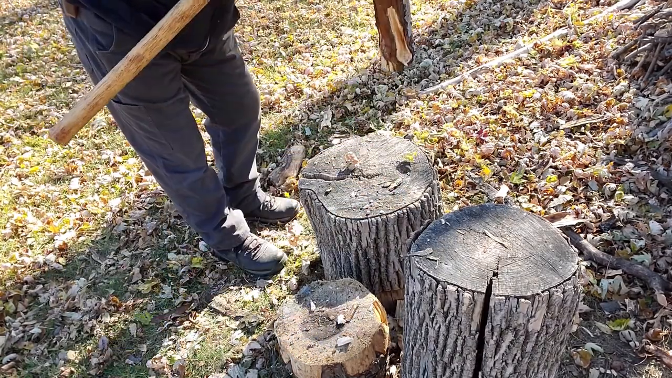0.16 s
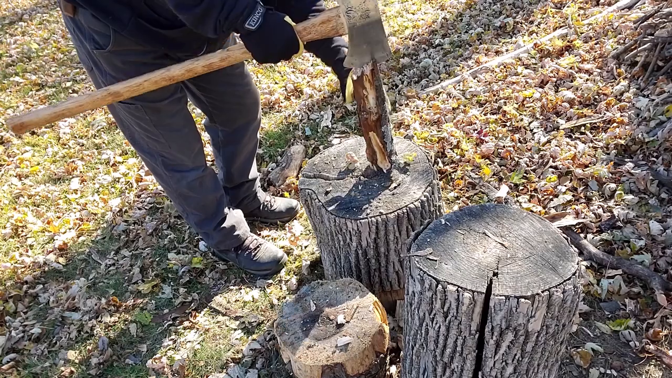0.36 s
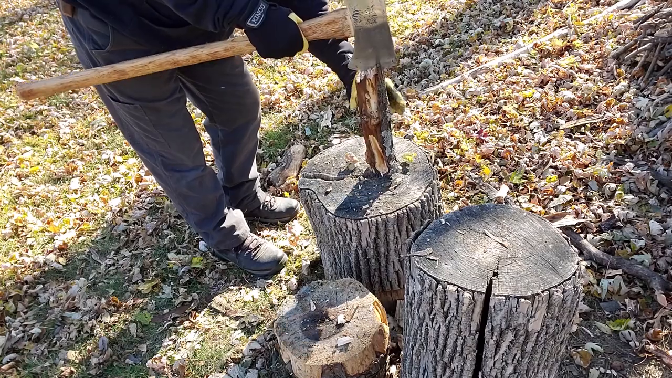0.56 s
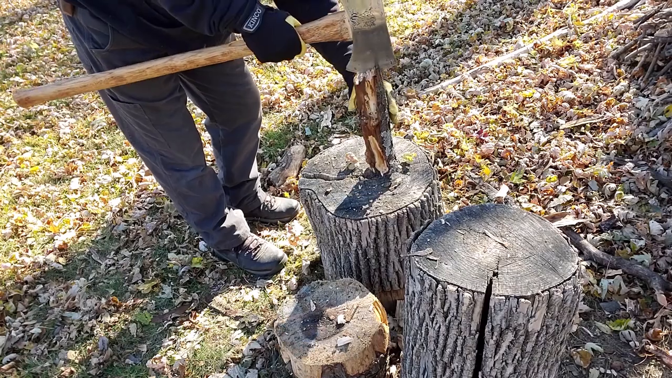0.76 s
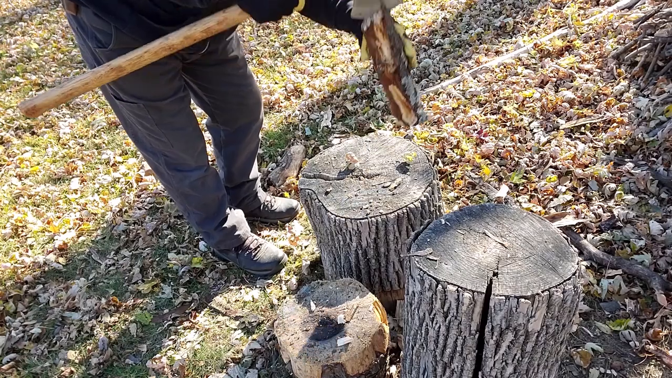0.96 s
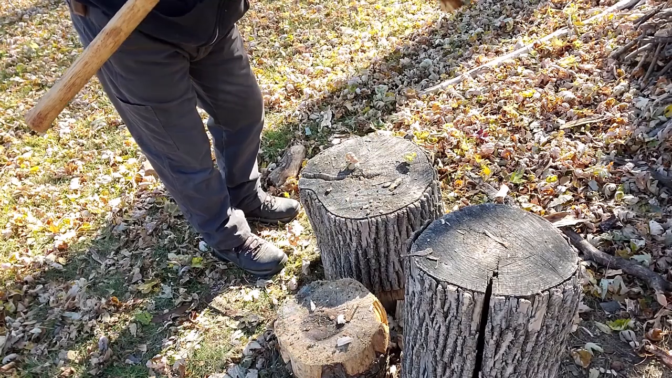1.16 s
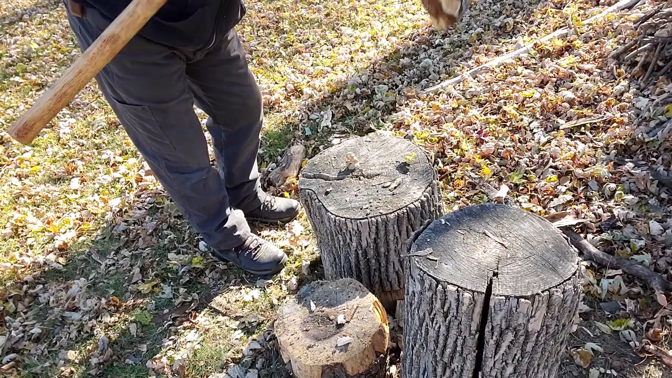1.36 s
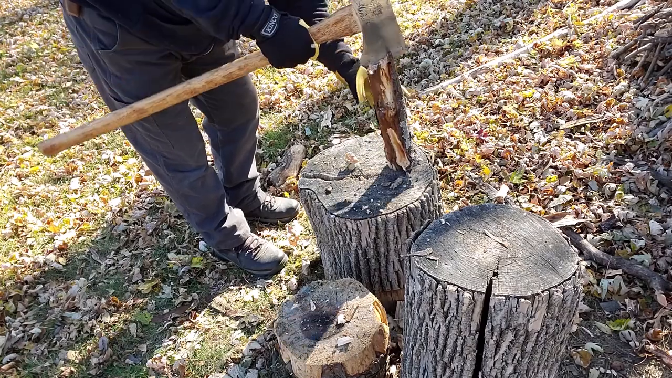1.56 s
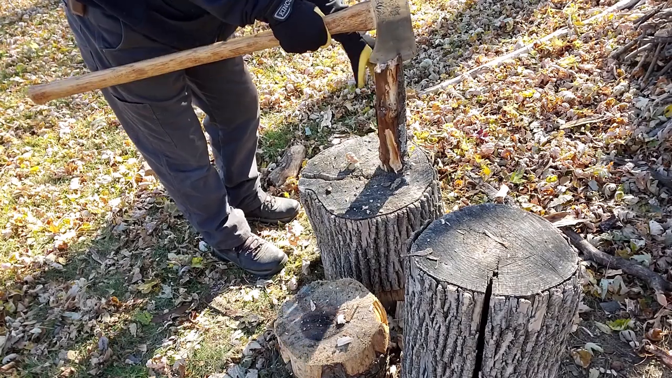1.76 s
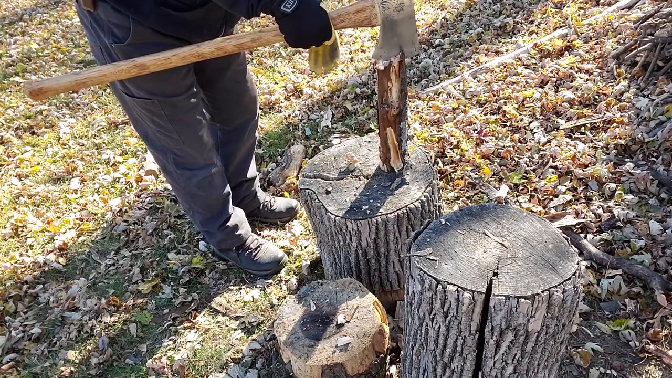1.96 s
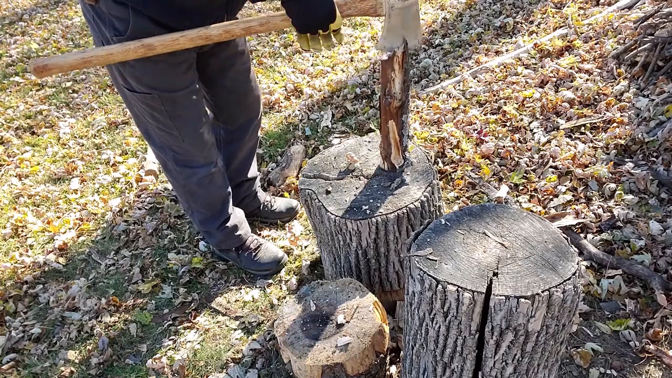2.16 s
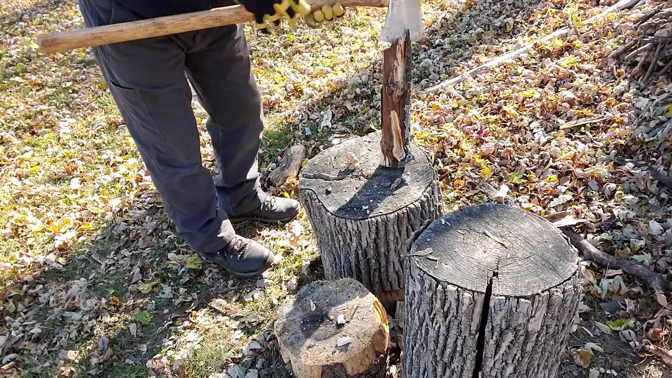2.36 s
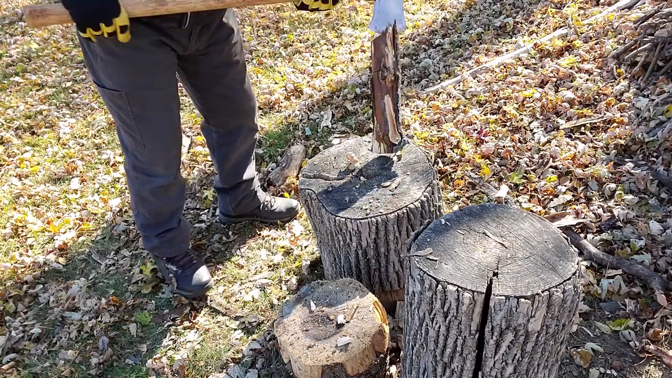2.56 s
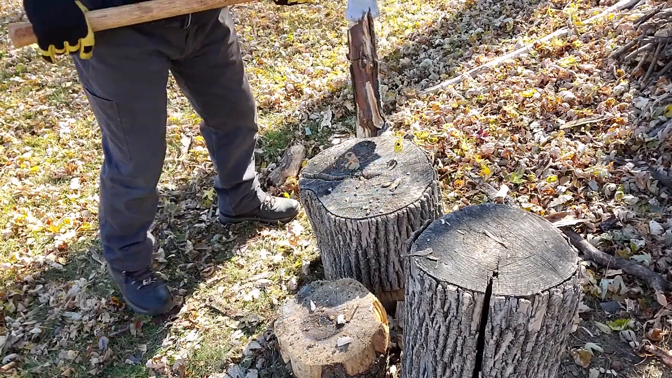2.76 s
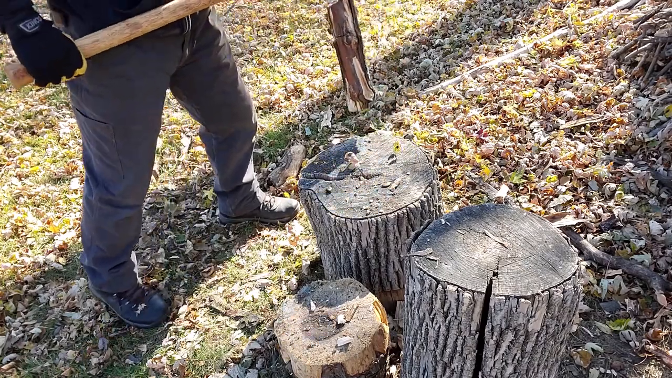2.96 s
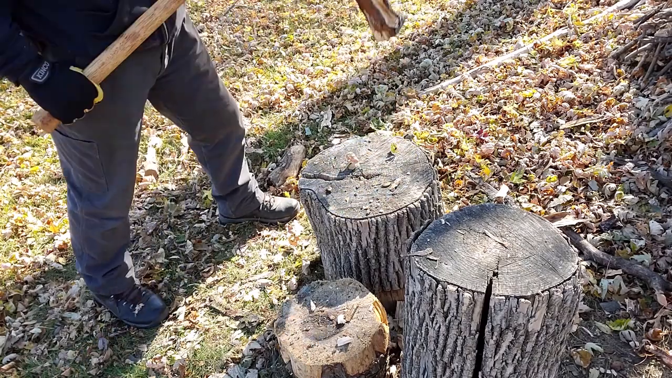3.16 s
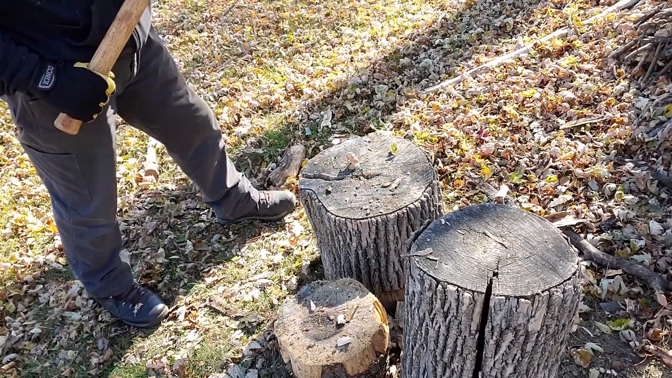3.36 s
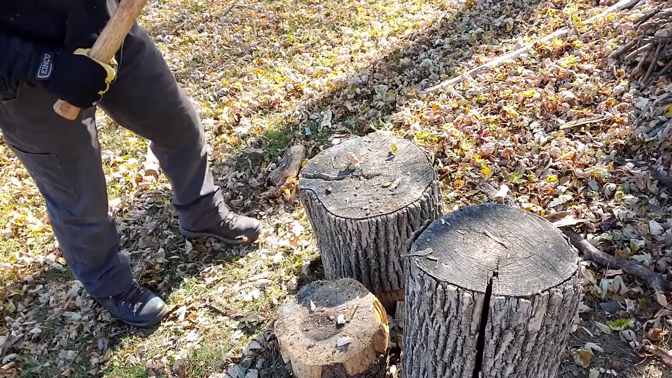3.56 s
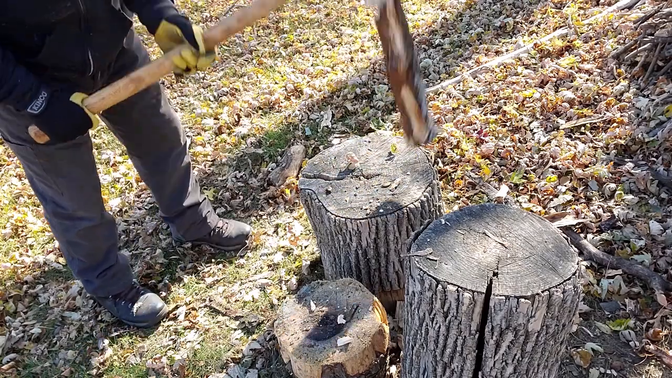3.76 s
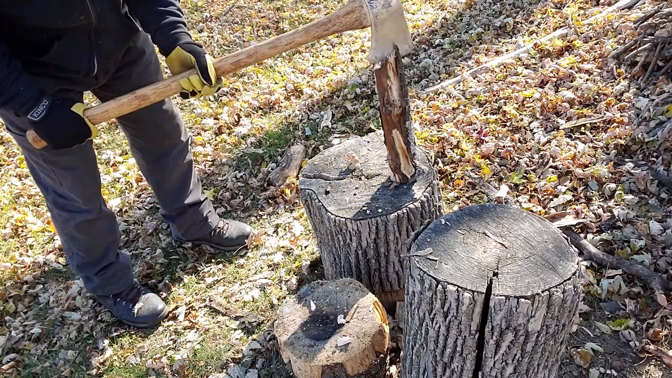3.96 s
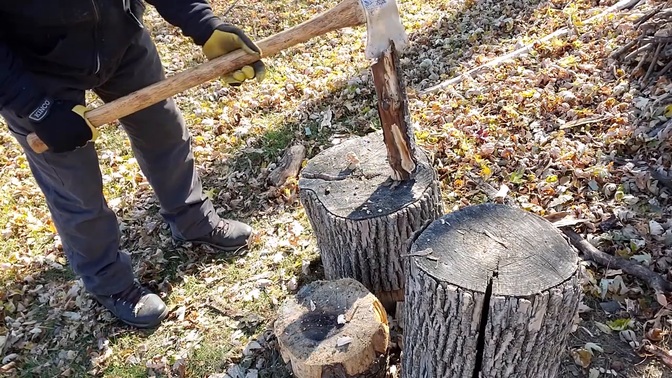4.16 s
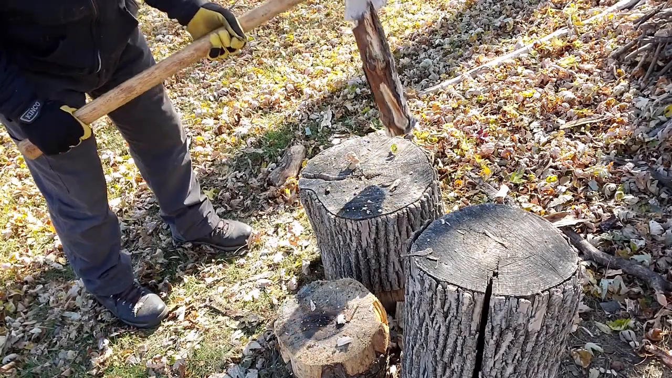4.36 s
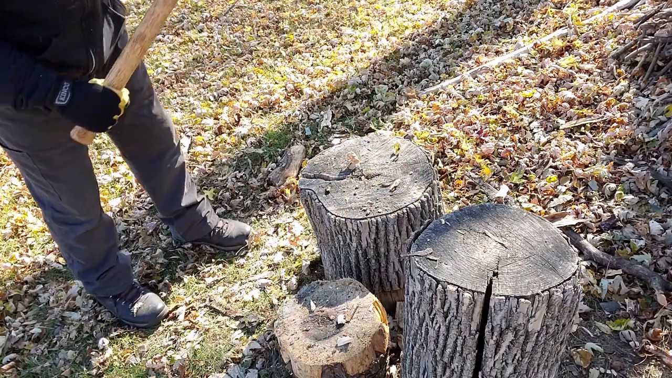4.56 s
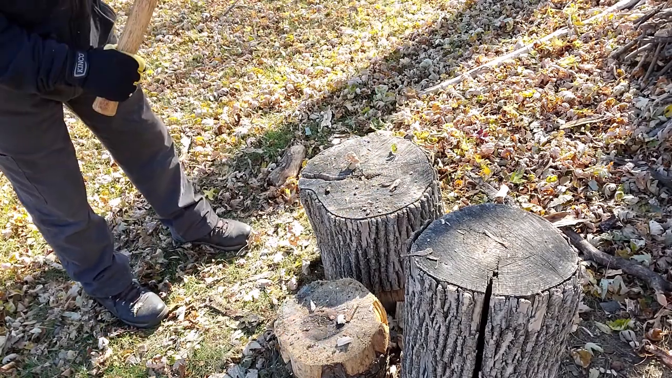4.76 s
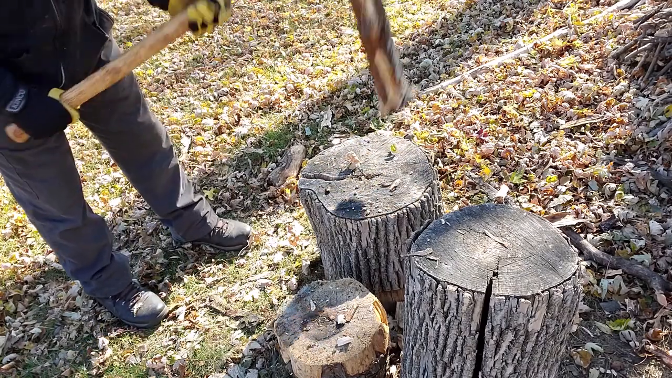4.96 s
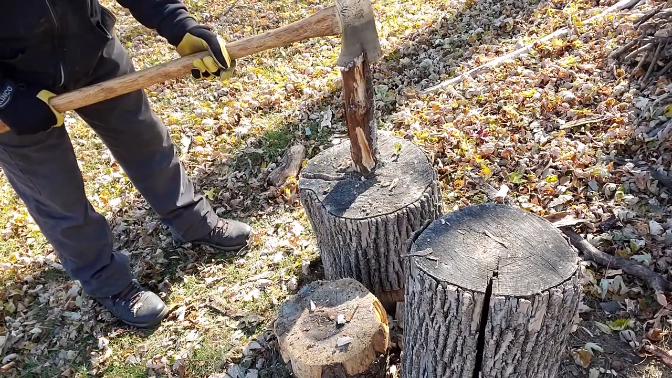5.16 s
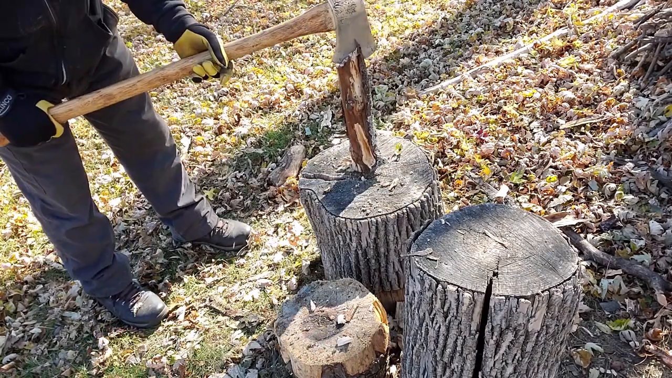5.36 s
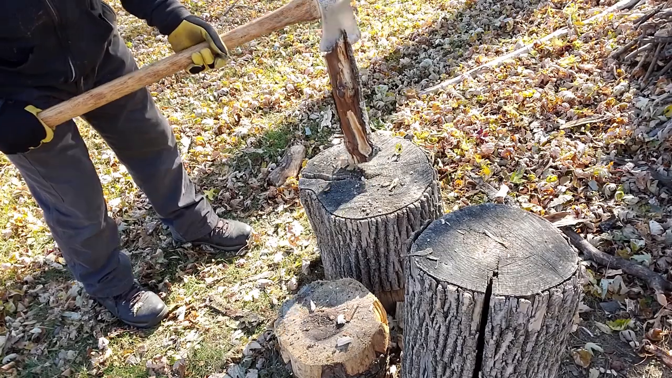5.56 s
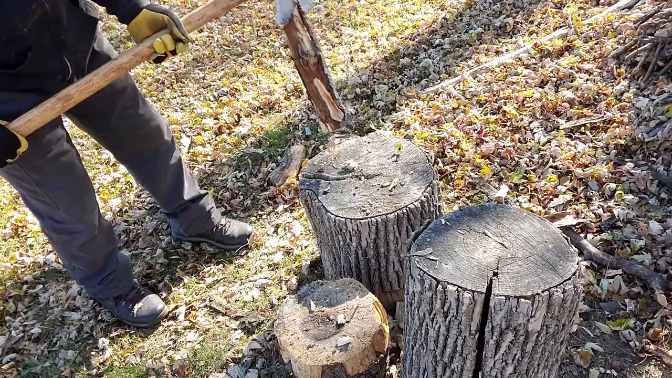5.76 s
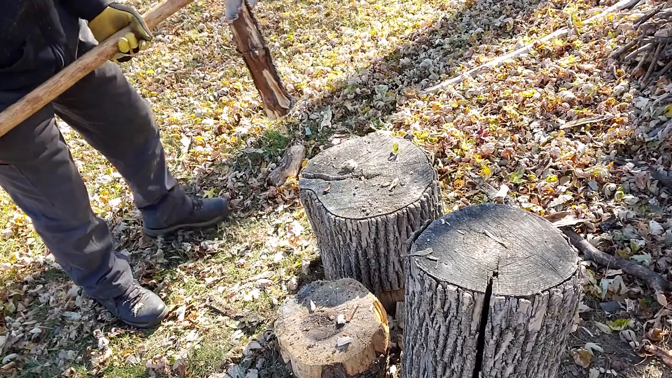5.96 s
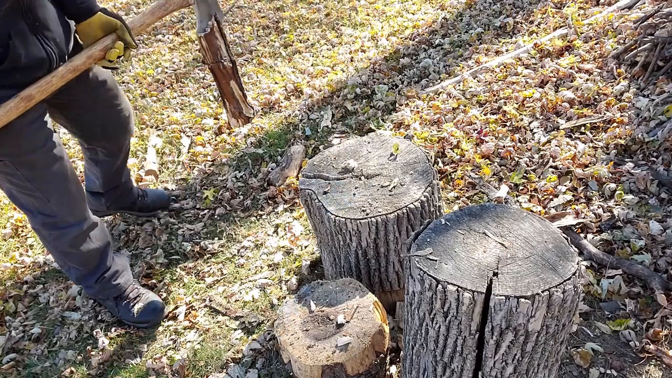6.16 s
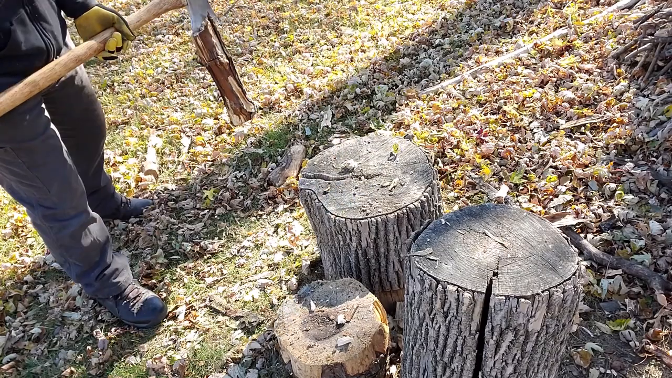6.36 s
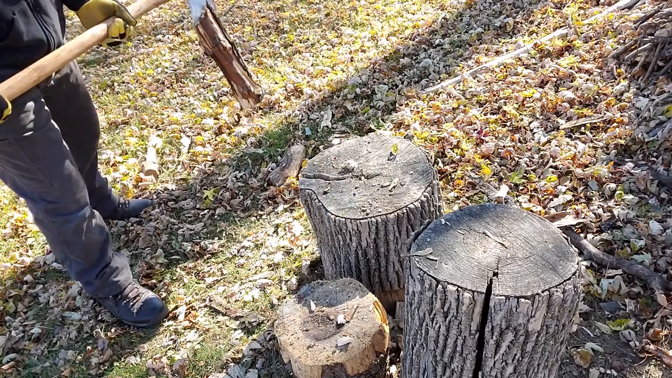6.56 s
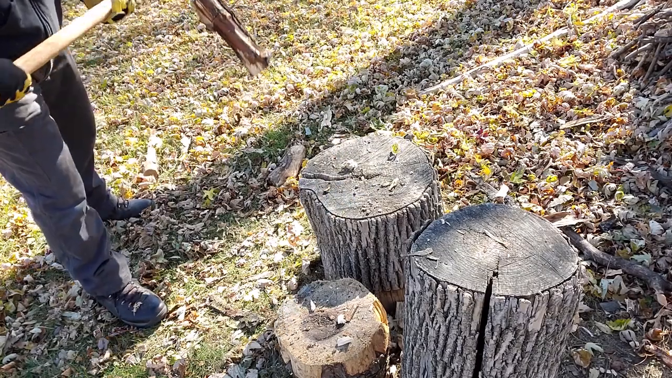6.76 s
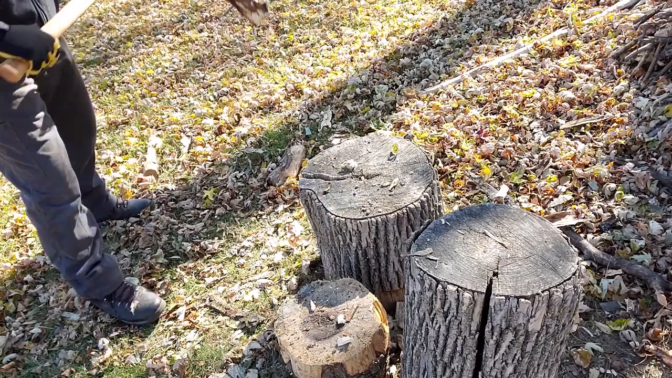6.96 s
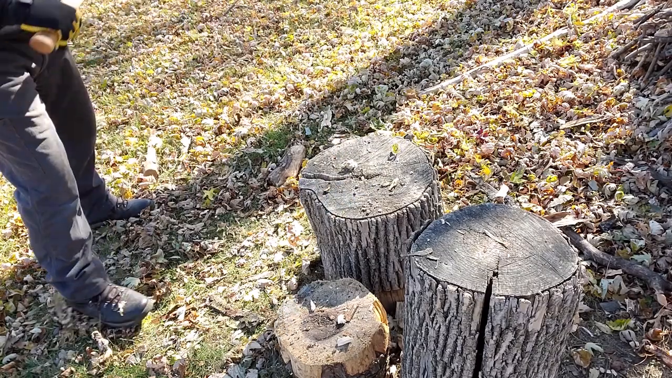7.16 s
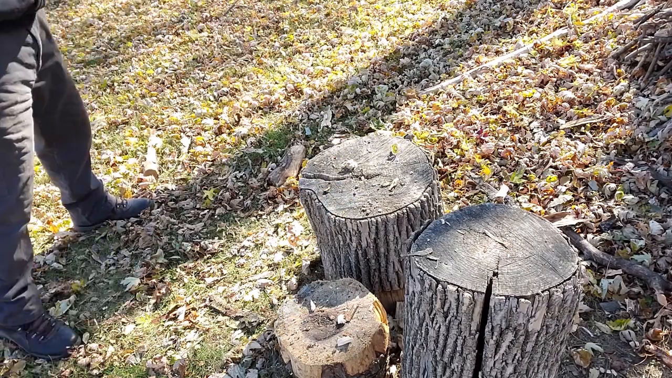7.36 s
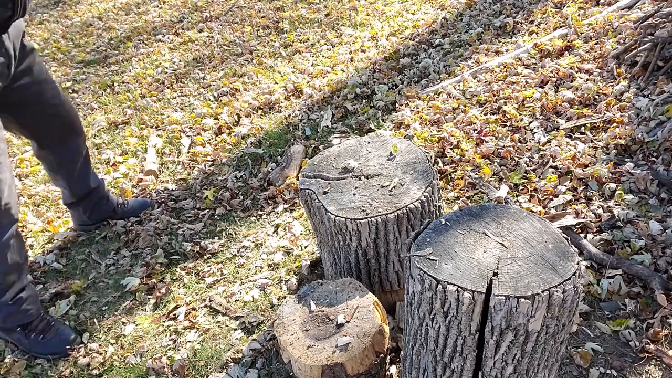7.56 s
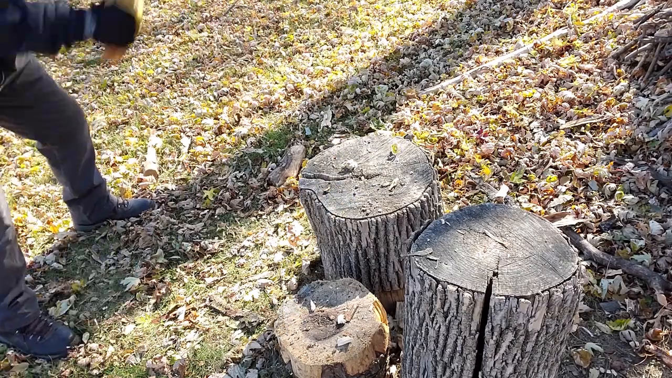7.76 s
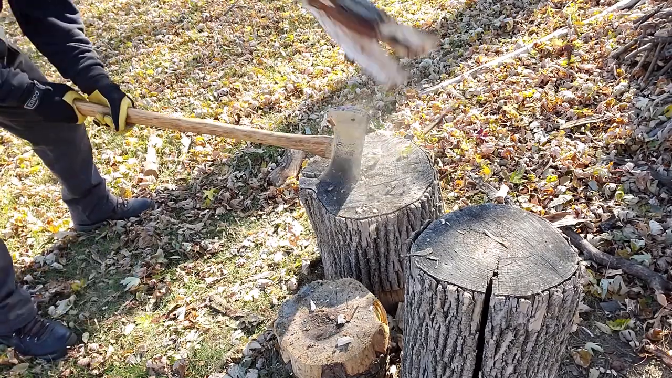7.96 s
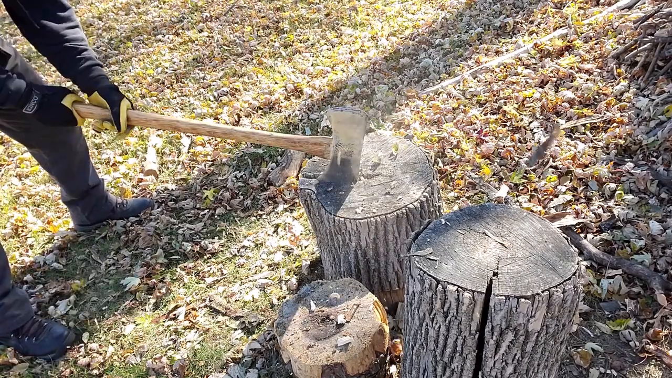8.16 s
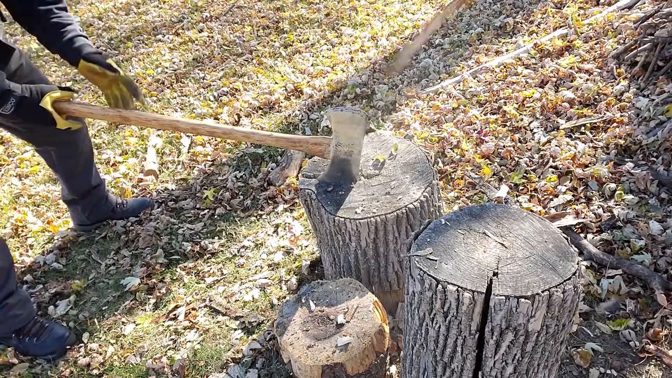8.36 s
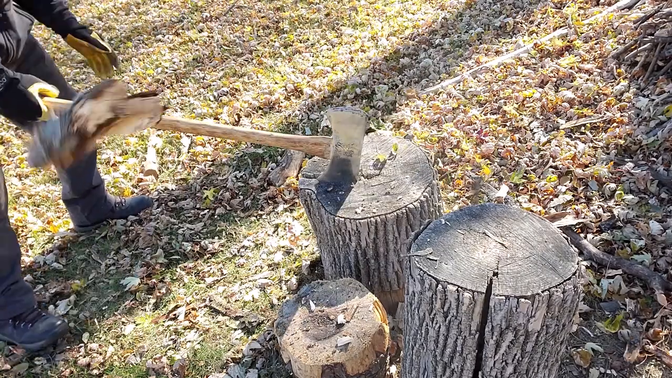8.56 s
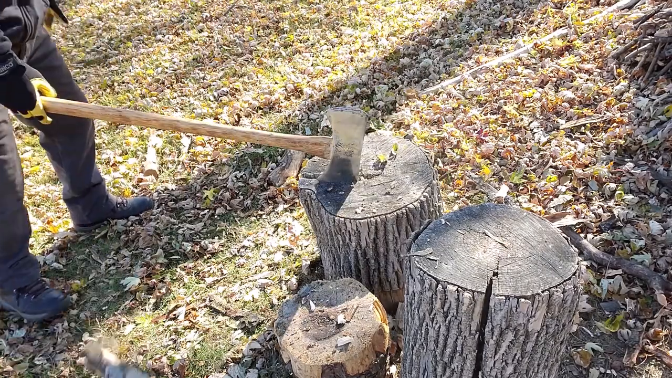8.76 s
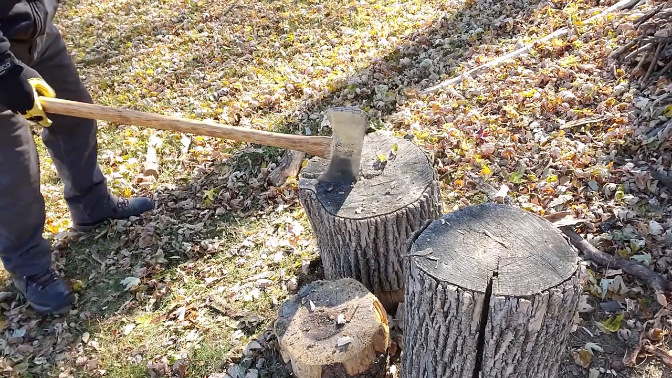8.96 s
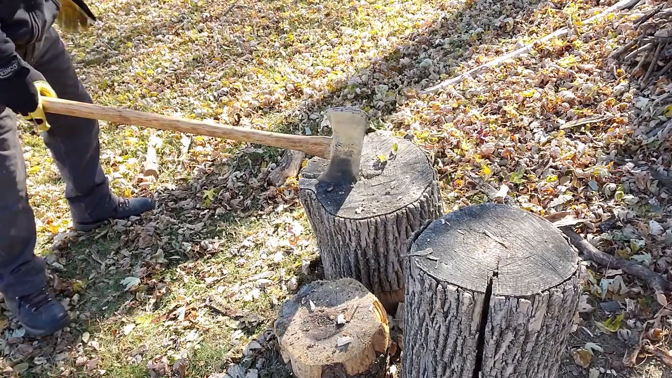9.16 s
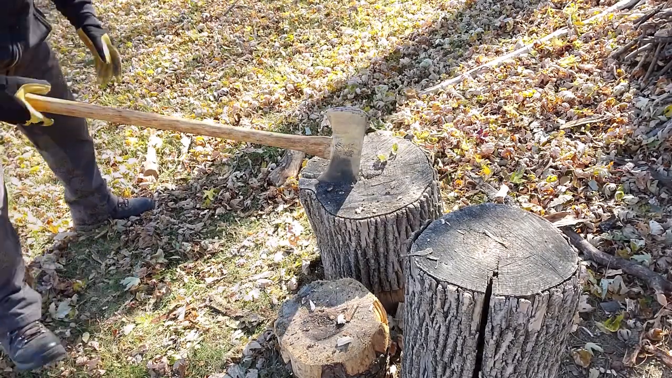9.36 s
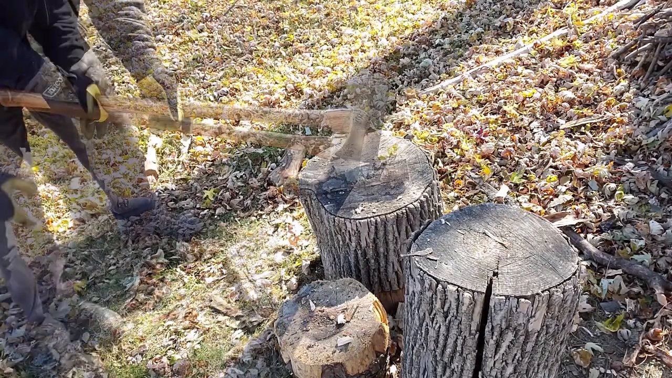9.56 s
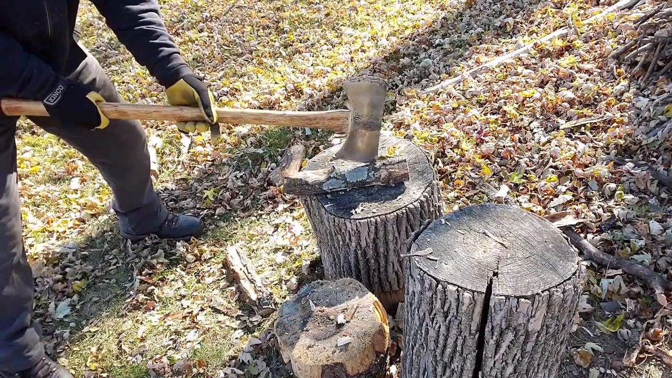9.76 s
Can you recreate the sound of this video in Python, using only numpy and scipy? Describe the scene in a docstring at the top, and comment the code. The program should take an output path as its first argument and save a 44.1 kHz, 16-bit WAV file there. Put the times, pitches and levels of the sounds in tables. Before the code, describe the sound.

Sharp woody axe blows on a stump, a short bright crackling hiss, then a loud splitting chop with pieces clattering into dry leaves.

```python
"""Splitting a small log with an axe

An axe with a small log stuck on its blade is banged on a stump four times, then swung through;
the halves split, fall and tumble in dry leaves. Boots rustle the leaves, wind buffets the microphone,
birds call and a far engine hums; after a short dropout a bright crackling hiss lasts under a second.
Blows are fading wood tones with noise, leaves, wind and hiss are shaped noise, and the rest is gliding or
steady tones.
"""
import sys
import numpy as np
from scipy import signal
from scipy.fft import rfft, irfft
from scipy.io import wavfile
from scipy.ndimage import uniform_filter1d

SR = 44100
rng = np.random.default_rng(int(sys.argv[2]) if len(sys.argv) > 2 else 0)


def digitize_waveform(pressure):
    """Quantize a signal to 16-bit integers and store it at the path in sys.argv[1].

    Rows of a 2-D input are taken as channels; values are limited to [-1, 1].
    """
    field = np.atleast_2d(pressure).T
    bounded = np.clip(field, -1, 1)
    quanta = np.round(bounded * 32767).astype(np.int16)
    wavfile.write(sys.argv[1], SR, quanta)


N = 433062  # length in samples

# All levels are relative, ahead of the recorder's gain. Noise colours say how strong each pitch is.

# Still air: pitch_hz, level_db (per Hz)
AIR_COLOUR = [(76, -38), (130, -2), (223, -9), (310, -9.5), (365, -4), (420, -14), (498, -9.5),
              (857, -11.5), (1910, -21.5), (2160, -25.5), (2340, -26), (7330, -36.5), (9130, -55),
              (15700, -59)]
AIR_DB = -48.5
# How alike noise is in the two ears: pitch_hz, likeness (1 same, 0 unrelated, below 0 opposed)
EAR_LIKENESS = [(60, 0.98), (130, 1), (290, 0.17), (640, -0.32), (1410, -0.39), (3100, -0.038),
                (6820, -0.056), (15000, -0.07)]

# Wind strength: time_s, buffeting_db, rumble_db (relative to the buffeting)
WIND_LEVELS = [(0.0, -30.5, -12.5), (0.27, -41.5, 2), (0.54, -43, -5.5), (1.43, -44.5, -1),
               (1.6, -40.5, -2), (1.85, -47.5, -5), (2.7, -43, -6), (3.7, -43, -16), (4.02, -45, -27),
               (4.82, -39, -5), (5.1, -48.5, -9), (5.72, -49, -26.5), (5.85, -40, -15), (6.38, -41, -9),
               (6.44, -59, 21), (7.75, -45, -10), (8.1, -50.5, -2), (8.8, -50.5, -22), (9.82, -44.5, -22)]
# Wind buffeting: pitch_hz, level_db (per Hz)
BUFFET_COLOUR = [(30, -9), (55, 5.5), (78, 13.5), (120, -11.5), (200, -8.5), (400, -54)]
# Deep wind rumble: pitch_hz, level_db (per Hz)
RUMBLE_COLOUR = [(12, -7), (28, 19), (45, 11), (60, 11), (100, -41)]

# Far engine: time_s, pitch_hz, level_db
ENGINE_PATH = [(7.229, 103.6, -48.5), (7.76, 94, -49), (7.81, 90.3, -54), (8.33, 98.7, -49.5),
               (9.4, 95.15, -48), (9.44, 103.8, -50), (9.82, 106, -35.5)]
# Engine tones: multiple (of the engine pitch), level_db (relative to ENGINE_PATH)
ENGINE_ORDERS = [(1, -1), (2, -11.5), (4, -18)]
WHINE_HZ, WHINE_DB = 2143, -75  # a faint tone of steady pitch

# Faint rustle that never stops: time_s, level_db
RUSTLE_LEVELS = [(0.0, -85.5), (0.31, -56.5), (0.75, -62), (1.4, -66.5), (2.1, -66), (2.3, -55.5),
                 (3.8, -57), (4.497, -56), (4.85, -75), (5.38, -57), (5.74, -52), (5.84, -63.5), (6.4, -46),
                 (7.22, -50), (7.28, -55), (8.0, -50), (9.2, -51), (9.62, -46)]
# Dry leaves: pitch_hz, level_db (per Hz)
LEAF_COLOUR = [(710, -4), (1200, -1), (1930, -5), (2220, -7.5), (2440, -8), (2780, -5), (5070, -3),
               (6930, 2), (10300, -10.5), (11500, -4), (15700, 3.5)]
# Boots, chips and wood stirring the leaves: start_s, length_s, start_db, end_db
SCUFFS = [(0.862, 0.028, -49, -73), (1.44, 0.044, -73, -37), (1.53, 0.17, -55, -58), (2.27, 0.38, -41, -45),
          (2.64, 0.21, -55.5, -63), (2.85, 0.22, -49, -47), (3.05, 0.18, -59, -49),
          (3.228, 0.14, -41, -64.5), (3.4, 0.28, -42.5, -31.5), (4.968, 0.034, -28, -31),
          (5.0, 0.11, -35, -64), (5.27, 0.075, -32, -66), (6.03, 0.42, -45, -50.5),
          (7.35, 0.51, -62.5, -27.5), (7.797, 0.038, -25, -10.5), (7.835, 0.16, -22, -58),
          (8.045, 0.047, -45, -40), (8.39, 0.04, -37, -52), (8.496, 0.032, -24.5, -48),
          (8.53, 0.12, -41, -52), (8.655, 0.0416, -41, -29.5), (8.695, 0.067, -38.5, -32),
          (8.77, 0.044, -31, -14), (8.82, 0.083, -35, -48), (8.87, 0.2, -36, -57.5),
          (9.025, 0.085, -26.5, -50.5), (9.1, 0.04, -45, -37), (9.143, 0.048, -31, -50),
          (9.64, 0.12, -34, -63), (9.76, 0.058, -66, -27.5)]

# Bird whistles that fall: start_s, length_s, start_hz, end_hz, level_db
CHIRPS = [(1.322, 0.08, 3390, 2820, -59.5), (4.924, 0.034, 4050, 3960, -59),
          (5.975, 0.047, 3140, 2770, -57), (8.17, 0.08, 3820, 3500, -51.5), (9.719, 0.06, 3250, 3070, -51)]
# Bird trill, one upsweep a row: start_s, top_hz, level_db
TRILL = [(4.298, 7800, -51.5), (4.369, 7160, -52), (4.455, 6730, -50.5), (4.522, 7100, -53.5),
         (4.606, 6800, -56.5), (4.684, 7050, -52), (4.79, 6000, -51), (4.898, 5900, -52)]
TRILL_NOTE_S, TRILL_START_HZ = 0.02, 5360

# Bright hiss: time_s, level_db
HISS_LEVELS = [(6.416, -24), (6.43, -22.5), (6.5, -25), (6.55, -24), (6.62, -28), (6.798, -29.5),
               (6.852, -43.5), (7.04, -31.5), (7.08, -28.5), (7.17, -23), (7.216, -24.5), (7.222, -30)]
# Bright hiss: pitch_hz, level_db (per Hz)
HISS_COLOUR = [(600, -18), (2000, -25.5), (3200, -13), (4300, -15.5), (4800, -21), (7500, -11), (9300, -4),
               (10250, -0.5), (10500, -33), (11500, -14), (12500, -21), (12900, -11), (14400, -23),
               (14700, -8), (15700, -3)]
# Duller crunch under the hiss: start_s, length_s, start_db, end_db
CRUNCHES = [(6.416, 0.17, -29.5, -44), (6.63, 0.14, -40, -67)]
# Crunch: pitch_hz, level_db (per Hz)
CRUNCH_COLOUR = [(1000, -23), (2200, -6.5), (3200, 4), (4400, -2), (5500, -28)]
# Short bright crackles, many of them in the hiss: start_s, level_db, pan_db (left minus right)
CRACKLES = [(0.571, -33, 2), (2.9771, -21, 10), (3.012, -30, 1.5), (3.2165, -22, 9), (3.241, -14, -3),
            (3.247, -15, 4), (3.313, -21, 0), (3.6841, -13, 7), (5.0724, -15, -1), (5.3284, -29, -.5),
            (5.3474, -30, 11), (6.4185, -19, 1), (6.4307, -8, 16), (6.4354, -9, 1.0), (6.4674, -13, 8),
            (6.482, 2.5, 7), (6.526, -6, 13), (6.565, -5, 11), (6.594, -18, 4), (6.646, -8, 6),
            (6.662, -6, 13), (6.667, -7, 14), (6.7142, -6, 7), (6.7361, -18, -3), (6.752, -8, 3),
            (6.78, -8, 6), (6.8017, -5, 11), (6.944, -20, -4), (6.982, -12, -1.5), (7.0763, -11, -7),
            (8.1115, -36, 2.5), (8.1804, -37, 4), (8.2067, -23, 12), (9.4372, -20, 11), (9.6549, -15, .5)]
# Tint of the crackles in the hiss: pitch_hz, gain_db
CRACKLE_COLOUR = [(2000, -7), (4000, -5), (7000, -19), (10000, -1), (11000, -17), (15000, -7)]

# Chips tearing off and scattering: start_s, length_s, start_db, end_db
SCATTER = [(0.364, 0.13, -43.5, -53), (1.526, 0.04, -34.5, -48), (1.569, 0.092, -41, -46),
           (3.766, 0.16, -28.5, -58.5), (4.956, 0.034, -42.5, -12.5), (5.021, 0.073, -27.5, -44),
           (5.043, .26, -38, -57), (7.747, 0.053, -43, -33), (7.796, 0.043, -27.5, -18),
           (7.843, 0.054, -26, -29.5), (7.888, 0.17, -23.5, -54.5), (8.744, 0.049, -23, -33.5),
           (8.796, 0.063, -20.5, -45), (9.028, 0.037, -29.5, -70)]
# Tearing wood: pitch_hz, level_db (per Hz)
TEAR_COLOUR = [(150, -56), (400, -2), (1000, 1), (2500, -2.5), (4500, -14.5), (7500, -17), (10000, -37),
               (15700, -34)]
# Fibres let go after each blow
SPLINTER_AFTER_S, SPLINTER_S, SPLINTER_DB, SPLINTER_END_DB = 0.012, 0.03, -36, -50
ONSET_SHARE = 0.19  # part of a burst's length over which it swells in
EDGE_S = 0.011  # width of the smoothing that rounds off a burst

# Tones of log and stump: pitch_hz, level_db, fade_s (time to fall 60 dB, before the ring share)
WOOD_MODES = [(200.7, -16.5, 0.095), (380, -21, 0.094), (470, -1.5, 0.019), (669, -6.5, 0.028),
              (850, -3, 0.014), (1164, -12, 0.012), (1266, -15.5, 0.042), (1501, -10, 0.016),
              (1880, -6.5, 0.016), (2415, -40, 0.0084), (2850, -18, 0.012), (3377, -18, 0.038)]
# Log banged on the stump: start_s, blow_db, pitch_factor, tilt_db (per octave, upper tones),
# log_db, log_pitch_factor (both for the log's own tone), low_db (two lowest tones), crack_db, thump_db,
# knock_db, ring_share (factor on fading times), contact_s, press_s
BLOWS = [(0.3293, 3, 0.98, -1.5, 3.5, 1.04, 2.5, -15, -13, -5, 0.79, 0.0021, 0.0072),
         (1.4884, 4, 1.036, -3, 0, 0.92, -8.5, -6, -15, -14.5, 0.96, 0.0022, 0.0056),
         (3.7816, -2, 0.95, -3.5, 1, 1.02, 3.5, -7, -2.5, -11, 0.87, 0.0012, 0.0067),
         (4.9845, -3, 1.03, -9, 3.5, 0.92, -10.5, -6.5, -12.5, -6, 1.02, 0.0009, 0.0064),
         (7.825, -8, 0.92, 1.5, 4, 1.03, -3, -2, -13, -7.5, 1.3, 0.0023, 0.0044),
         (7.8361, -7, 0.99, -3.5, -1, 0.99, 0, -10, -13, -18, 1.7, 0.00077, 0.0035)]
# Loose wood landing: the columns of BLOWS, then lag_samples (how late the right ear is)
LANDINGS = [(1.584, -24.5, 0.87, -8, -2, 1.06, 7, -9, 6.5, -16, 0.4, 0.0022, 0.0034, 1),
            (8.372, -28, 0.73, -12, 6, 0.9, 6, -7, -16, -17, 0.84, .002, 0.0035, 5),
            (8.75, -8, 0.797, 0, -15, 1.006, -7, 6.5, -0.5, 8, 0.24, 0.0023, 0.0056, -5.5),
            (8.8071, -16, 2.16, -2.5, 14, 0.94, -21, 11, -25, -2, 0.95, 0.0032, 0.0036, 1)]
THUMP_FADE_S = 0.11  # stump pushed into the soil: time to fall 60 dB, before the ring share
STUMP_HZ, GROUND_HZ = 69.5, 157.5  # pitch of the low thump
BLOW_LAG = 4.7  # samples that the right ear is late
# Chips, twigs and leaves snapping: start_s, level_db, knock_hz, treble_db
SNAPS = [(0.379, -28, 880, -22), (0.413, -32, 1210, -12), (0.8646, -32.5, 910, 0), (1.534, -26, 902, -8),
         (1.615, -11, 1880, -2), (1.64, -21, 1160, -4), (1.941, -37.5, 1280, 2), (2.858, -28.5, 1750, -1.5),
         (3.821, -21, 1320, -6), (3.827, -30, 2020, -22), (3.888, -31, 1330, -2), (4.9694, -14, 4000, -1),
         (5.03, -24, 2300, -5), (5.037, -31, 520, -30), (5.0713, -25, 890, -25), (5.088, -26, 900, -14),
         (5.105, -22.5, 1520, -15), (5.1305, -31, 1200, -26), (5.64, -24.5, 1100, 7),
         (7.2916, -26.5, 1020, -2), (7.529, -25.5, 890, -1.5), (7.576, -26, 4360, -5),
         (7.624, -15, 3760, -3), (7.796, -6.5, 2540, -4), (7.8073, -2.5, 2000, -1.5),
         (7.818, -12, 2900, -6), (7.857, -9, 3250, -12), (7.8725, -18, 850, -18), (7.9126, -21, 900, 1),
         (8.05, -20.5, 4080, -4), (8.075, -16, 2700, 5), (8.1362, -29, 2920, -2), (8.2233, -28, 1700, -10),
         (8.273, -23, 1560, -3.5), (8.3535, -21, 2120, -6), (8.377, -22, 3900, -4), (8.393, -21, 2966, 1),
         (8.499, -8.5, 1550, -1.5), (8.6154, -26.5, 1105, -5), (8.7598, -9, 2400, -6),
         (8.8282, -16, 1500, -6), (9.147, -12.5, 4000, 4), (9.196, -22.5, 5140, -3)]
# Tint of blows, landings, snaps and birds: pitch_hz, gain_db
NEAR_COLOUR = [(7000, -4), (9000, -15.5), (10300, -11.5), (12000, -8.5), (15500, -5.5)]

# Recorder gain with a short dropout: time_s, gain_db
RECORDER_GAIN = [(6.376, 7.5), (6.379, -7), (6.397, -30.5), (6.399, -80), (6.414, -80), (6.416, 6)]
MIC_EDGE_HZ, FINAL_EDGE_HZ = 15750, 16400  # upper limits before and after the overload


def amp(db):
    """Decibels turned into a plain multiplier."""
    return 10 ** (np.asarray(db) / 20)


def evened(x):
    """The same sound scaled to an average strength (rms) of 1."""
    return x / np.sqrt(np.mean(x ** 2) + 1e-20)


def read(points, hz):
    """Value of a curve at given pitches, joined in straight lines on a log pitch scale."""
    point_hz, value = np.transpose(points)
    return np.interp(np.log(hz + 1), np.log(point_hz + 1), value)


def level(rows):
    """Gain over time from a (time_s, level_db) curve; silent outside it."""
    return amp(np.interp(np.arange(N) / SR, *np.transpose(rows), left=-200, right=-200))


def add(mix, start_s, sound):
    """Lays a sound into the mix at its start time, cut off at the end."""
    part = mix[:, round(start_s * SR):][:, :sound.shape[1]]
    part += sound[:, :part.shape[1]]


def band(x, lo_hz, hi_hz):
    """Keeps the part of a sound between two pitches, at rms 1."""
    return evened(signal.lfilter(*signal.butter(2, [lo_hz, hi_hz], "band", fs=SR), x))


def tinted(x, colour):
    """A sound made stronger or weaker at each pitch."""
    return irfft(rfft(x) * amp(read(colour, np.fft.rfftfreq(N, 1 / SR))), N)


def ears(x, lag, pan_db=0):
    """A sound in two ears, the right one later by a fractional number of samples."""
    x = np.pad(x, 16)
    turn = np.exp(-2j * np.pi * np.fft.rfftfreq(len(x)) * lag)
    right = irfft(rfft(x) * turn, len(x))
    return np.array([x, right]) * amp([[pan_db / 2], [-pan_db / 2]])


def noise(colour, patchy_db, flicker_db, size, alike=1):
    """Two-ear noise of rms 1 from random short spectra, with drifting patches and a flicker at all pitches."""
    hop, hz = size // 4, np.fft.rfftfreq(size, 1 / SR)
    frames = N // hop + 5
    a, b, c, d, patches = rng.standard_normal((frames, len(hz), 5)).T
    patches = uniform_filter1d(patches, size=size // 64, axis=0)  # blend across pitch
    patches = evened(uniform_filter1d(patches, size=8, axis=1))  # blend across time
    flicker = np.minimum(rng.exponential(1, frames), 4)
    same = np.clip(alike * read(EAR_LIKENESS, hz), -1, 1)[:, None]
    left = a + 1j * b
    right = same * left + np.sqrt(1 - same ** 2) * (c + 1j * d)
    spectra = np.array([left, right])
    spectra *= amp(read(colour, hz)[:, None] + patchy_db * patches + flicker_db * flicker)
    return evened(signal.istft(spectra, nperseg=size, noverlap=size - hop)[1][:, :N])


def grainy(x, per_s, spread_db, fade_s, bed):
    """Breaks a noise into short fading grains at random times over a smooth bed."""
    sizes = amp(spread_db * np.minimum(rng.exponential(1, N), 4))
    starts = rng.random(N) < per_s / SR
    grains = signal.lfilter([1], [1, -amp(-60 / (fade_s * SR))], sizes * starts)
    return evened(x * (bed + evened(grains)))


def bursts(rows):
    """Gain over time of bursts that swell in, slide from one level to another and stop."""
    gain = np.zeros((1, N))
    for start_s, length_s, start_db, end_db in rows:
        u = np.linspace(0, 1, round(length_s * SR))
        swell = np.minimum(u / ONSET_SHARE, 1)
        add(gain, start_s, (swell * amp(start_db + (end_db - start_db) * u))[None])
    return uniform_filter1d(gain, round(EDGE_S * SR))


def still_air():
    """Soft steady background noise, strongest in the low pitches."""
    return amp(AIR_DB) * noise(AIR_COLOUR, 1.0, 1.0, size=1024)


def wind():
    """Lumpy buffeting and a deeper rumble, only partly shared by the ears."""
    time_s, buffet_db, rumble_db = np.transpose(WIND_LEVELS)
    buffet = noise(BUFFET_COLOUR, 1.17, 0.33, size=2048, alike=0.57)
    rumble = noise(RUMBLE_COLOUR, 3.0, 0.5, size=2048, alike=0.31)
    buffet_gain = level(np.transpose([time_s, buffet_db]))
    rumble_gain = level(np.transpose([time_s, buffet_db + rumble_db]))
    return buffet_gain * buffet + rumble_gain * rumble


def engine():
    """A far engine as tones at multiples of one moving pitch, and a faint tone that wavers in level."""
    t = np.arange(N) / SR
    time_s, pitch_hz, level_db = np.transpose(ENGINE_PATH)
    turns = np.cumsum(np.interp(t, time_s, pitch_hz)) / SR
    hum = sum(amp(db) * np.sin(2 * np.pi * multiple * turns) for multiple, db in ENGINE_ORDERS)
    waver = 1 + 0.5 * evened(uniform_filter1d(rng.standard_normal(N), size=1500))
    whine = amp(WHINE_DB) * waver * np.sin(2 * np.pi * WHINE_HZ * t)
    hum_gain = level(np.transpose([time_s, level_db]))
    return np.sqrt(2) * (hum * hum_gain + whine)  # a sine of rms 1 peaks at root 2


def dry_leaves():
    """Many tiny grains of noise: a faint steady rustle, and stronger scuffs as the leaves are stirred."""
    rustle = grainy(noise(LEAF_COLOUR, 2.4, 0.45, size=256), per_s=300, spread_db=3.8, fade_s=0.004, bed=3.2)
    held_to_end = RUSTLE_LEVELS + [(N / SR, RUSTLE_LEVELS[-1][1])]
    return (level(held_to_end) + bursts(SCUFFS)) * rustle


def chirp(length_s, start_hz, end_hz, db):
    """A gliding whistle with a blurred echo from the trees."""
    u = np.arange(round(length_s * SR)) / (length_s * SR)
    glide_hz = start_hz + (end_hz - start_hz) * u ** 0.825
    tone = np.sin(2 * np.pi * np.cumsum(glide_hz) / SR) * np.sin(np.pi * u)
    waver = evened(uniform_filter1d(rng.standard_normal(len(u)), size=80))
    tone *= 1 + 0.65 * waver  # the whistle wavers in level
    echo = rng.standard_normal((2, 3000)) * amp(-23.5 - 60 * np.arange(3000) / SR / 0.14)
    echo[:, 0] = 1  # the direct sound
    return amp(db) * signal.fftconvolve(tone[None], echo, axes=1)


def birds():
    """A trill of upsweeps and a few falling whistles."""
    calls = np.zeros((2, N))
    for start_s, top_hz, db in TRILL:
        add(calls, start_s, chirp(TRILL_NOTE_S, TRILL_START_HZ, top_hz, db))
    for start_s, *note in CHIRPS:
        add(calls, start_s, chirp(*note))
    return calls


def bright_hiss():
    """A bright grainy hiss with a duller, coarser crunch under it."""
    fine = grainy(noise(HISS_COLOUR, 1.74, 0.69, size=512), per_s=300, spread_db=3.2, fade_s=0.005, bed=3.0)
    coarse = grainy(noise(CRUNCH_COLOUR, 2.5, 0.9, size=256), per_s=122, spread_db=2.0, fade_s=0.014, bed=1.6)
    return level(HISS_LEVELS) * fine + bursts(CRUNCHES) * coarse


def snap(db, knock_hz, treble_db, pan_db=8.5, fade_s=0.023):
    """A woody knock over an octave wide under a bright click, both fading noise."""
    t = np.arange(1500) / SR
    dull, bright = rng.standard_normal((2, len(t)))
    knock = band(dull, 0.63 * knock_hz, 1.86 * knock_hz) * amp(-60 * t / (1.1 * fade_s))
    click = band(bright, 4700, 21900) * amp(-60 * t / fade_s)
    sound = knock * (1 - min(amp(treble_db), 0.9)) + amp(treble_db) * click
    sound *= 1 - np.exp(-t / 0.00011)  # very quick start
    return amp(db) * ears(sound / abs(sound).max(), 4.93, pan_db)


def crackles():
    """Very short bright snaps with the colour of the leaves, or their own colour during the hiss."""
    in_leaves, in_hiss = np.zeros((2, 2, N))
    for start_s, db, pan_db in CRACKLES:
        during_hiss = HISS_LEVELS[0][0] < start_s < HISS_LEVELS[-1][0]
        add(in_hiss if during_hiss else in_leaves, start_s, snap(db, 4700, -0.52, pan_db, fade_s=0.0072))
    return amp(-9) * tinted(in_leaves, LEAF_COLOUR) + tinted(in_hiss, CRACKLE_COLOUR)


def ringing(t, fading, pitch, tilt_db, log_db, log_pitch, low_db, ring):
    """The wood's tones; where a blow lands sets the upper slope, the log's own tone and the two lowest."""
    hz, db, fade_s = np.transpose(WOOD_MODES)[:, :, None]
    main_hz, log_hz = WOOD_MODES[2][0], WOOD_MODES[4][0]
    db = db + np.where(hz >= main_hz, tilt_db * np.log2(hz / main_hz), low_db)
    db = db + log_db * (hz == log_hz)
    hz = np.where(hz == log_hz, hz * log_pitch, hz)
    tones = amp(db - 60 * fading / (ring * fade_s)) * np.sin(2 * np.pi * hz * pitch * t)
    return tones.sum(axis=0)


def clatter():
    """Grainy tearing noise from splinters and chips, part of it ringing the wood."""
    splinters = [(start_s + SPLINTER_AFTER_S, SPLINTER_S, SPLINTER_DB, SPLINTER_END_DB) for start_s, *_ in BLOWS]
    tearing = grainy(noise(TEAR_COLOUR, 2.5, 0.5, size=128), per_s=800, spread_db=2.6, fade_s=0.01, bed=2.0)
    rough = bursts(splinters + SCATTER) * tearing
    t = np.arange(3000) / SR
    modes = ringing(t, t, pitch=1.0, tilt_db=-1.0, log_db=0, log_pitch=1, low_db=-8, ring=0.6)
    modes = modes[None] / np.linalg.norm(modes) / 4.6
    rung = signal.oaconvolve(rough, modes, axes=1)[:, :N]
    return amp(-1.5) * rough + amp(-4.0) * rung


def chop(db, pitch, tilt_db, log_db, log_pitch, low_db, crack_db, thump_db, knock_db, ring, contact_s, press_s,
         thump_hz, lag):
    """A bright crack, a rough knock, the wood's tones held while the blade presses, and a low thump."""
    t = np.arange(8000) / SR
    contact = 1 - np.exp(-(t / contact_s) ** 2)
    after = np.logaddexp(0, (t - press_s) / 0.0016) * 0.0016  # time since the blade let go, rounded off
    wood = ringing(t, after, pitch, tilt_db, log_db, log_pitch, low_db, ring)
    thump = np.cos(2 * np.pi * thump_hz * t - 2.3) * amp(-60 * t / (ring * THUMP_FADE_S))
    thump *= 1 - np.exp(-t / (ring * 0.017))  # slow start
    bright, dull = rng.standard_normal((2, 2, len(t)))
    crack_fade = amp(-60 * t / 0.02) + 0.2 * amp(-60 * t / 0.083)
    crack = amp(crack_db) * band(bright, 1850, 19800) * crack_fade * contact
    knock = amp(knock_db) * band(dull, 274, 2840) * amp(-60 * t / (ring * 0.055)) * contact
    near = wood * contact + 2 * amp(thump_db) * thump + crack[0] + knock[0]
    both = ears(near, lag)[:, :len(t)]
    both += 0.5 * (crack + knock)  # scattered part, different in each ear
    return amp(db) * both


def blows():
    """Blows on the stump, wood landing and snaps."""
    hits = np.zeros((2, N))
    for start_s, *blow in BLOWS:
        add(hits, start_s, chop(*blow, STUMP_HZ, BLOW_LAG))
    for start_s, *landing, lag in LANDINGS:
        add(hits, start_s, chop(*landing, GROUND_HZ, lag))
    for start_s, *row in SNAPS:
        add(hits, start_s, snap(*row))
    return hits


def scene():
    """All sounds together, from the background to the blows."""
    background = still_air() + wind() + engine()
    leaves_and_hiss = dry_leaves() + bright_hiss() + crackles()
    tinted_sounds = tinted(birds() + blows(), NEAR_COLOUR)
    return background + leaves_and_hiss + clatter() + tinted_sounds


def low_pass(x, edge_hz):
    """Removes everything above a pitch with a steep filter."""
    return signal.oaconvolve(x, signal.firwin(511, edge_hz, window=("kaiser", 9), fs=SR)[None], "same")


def record(dry):
    """Microphone band, recorder gain with the short dropout, overload of loud peaks, then a band limit."""
    mic = low_pass(dry, MIC_EDGE_HZ)
    mic *= amp(np.interp(np.arange(N) / SR, *np.transpose(RECORDER_GAIN)))
    clipped = np.clip(mic, -0.98, 0.98)
    return np.clip(low_pass(clipped, FINAL_EDGE_HZ), -1, 1)


dry = scene()
out = record(dry)
digitize_waveform(out)
```